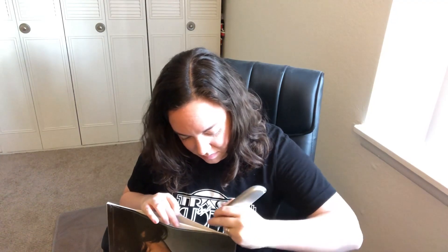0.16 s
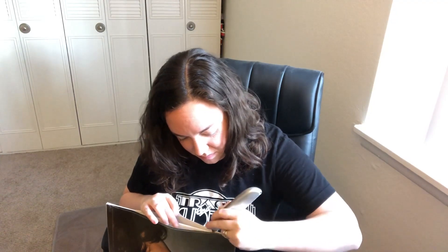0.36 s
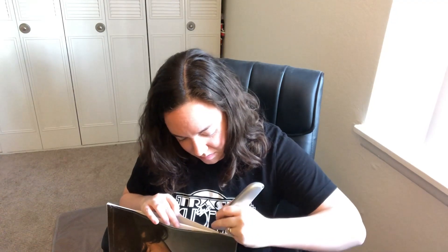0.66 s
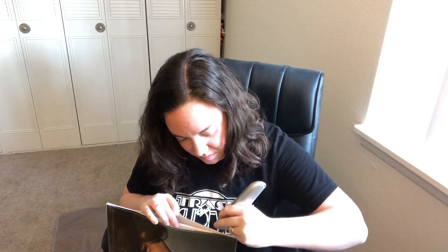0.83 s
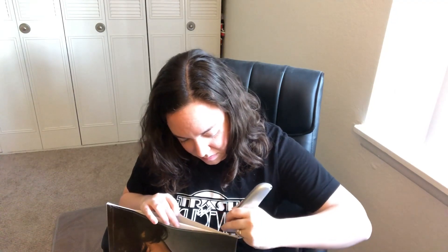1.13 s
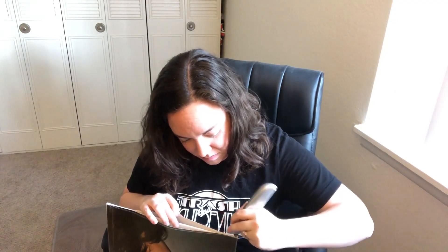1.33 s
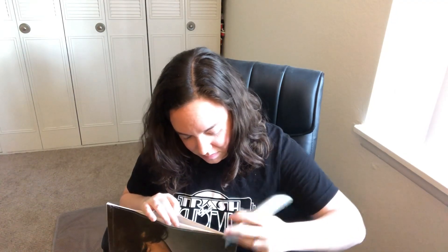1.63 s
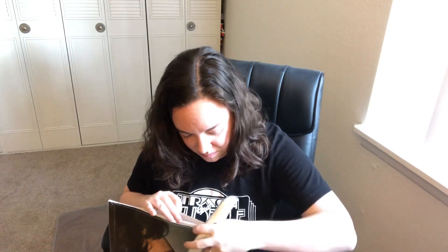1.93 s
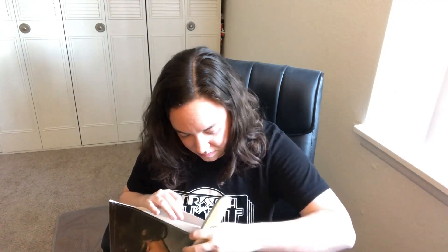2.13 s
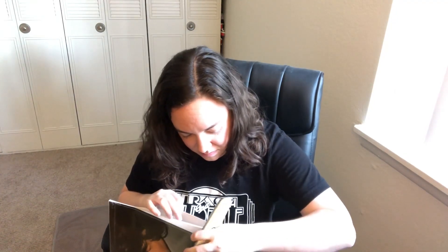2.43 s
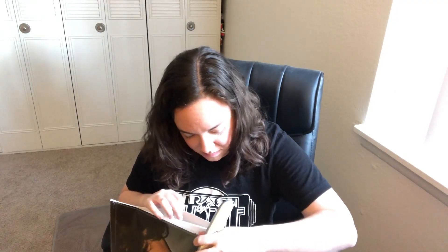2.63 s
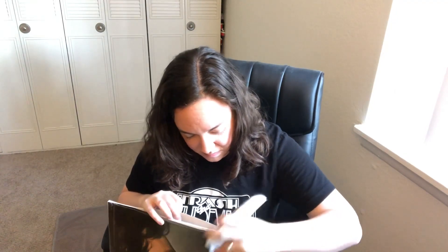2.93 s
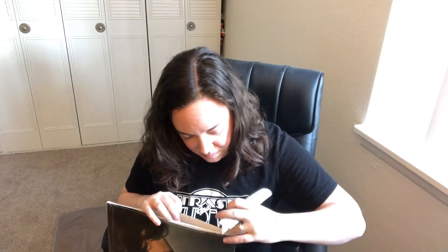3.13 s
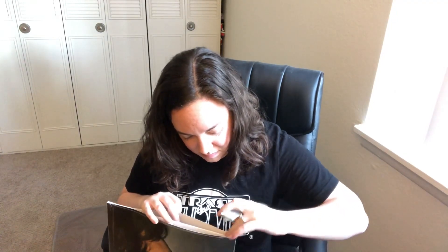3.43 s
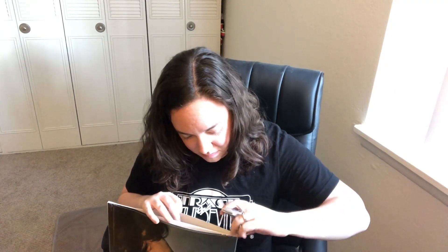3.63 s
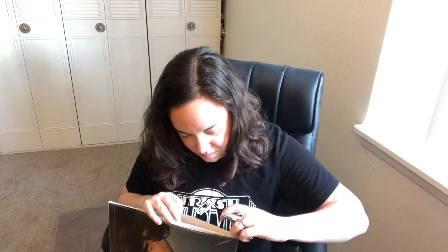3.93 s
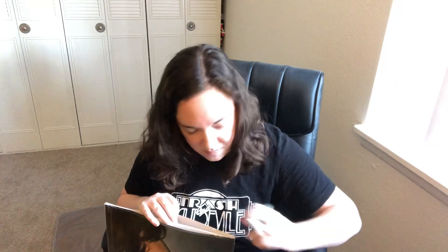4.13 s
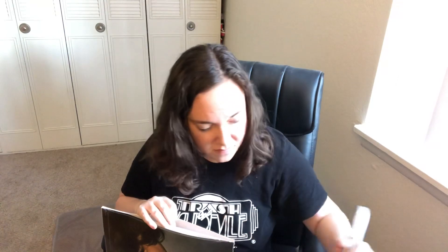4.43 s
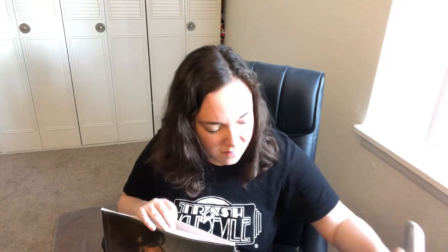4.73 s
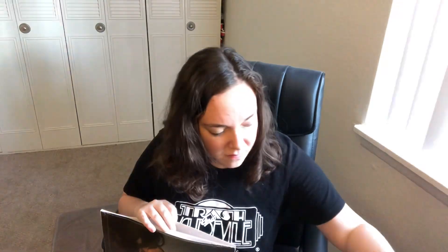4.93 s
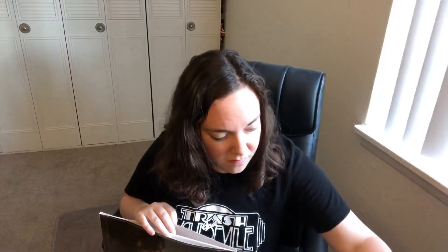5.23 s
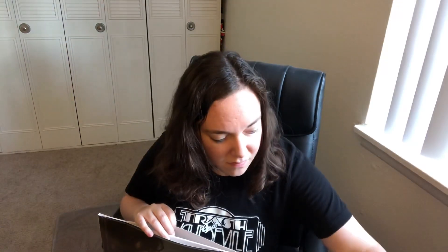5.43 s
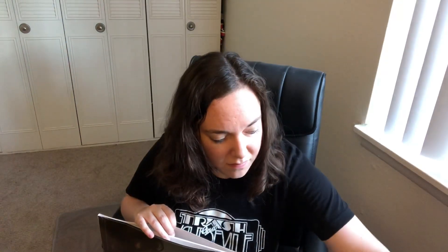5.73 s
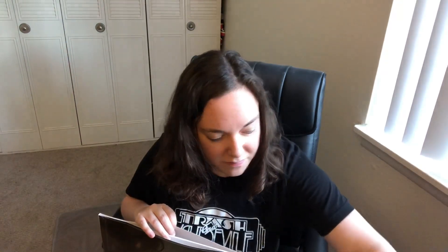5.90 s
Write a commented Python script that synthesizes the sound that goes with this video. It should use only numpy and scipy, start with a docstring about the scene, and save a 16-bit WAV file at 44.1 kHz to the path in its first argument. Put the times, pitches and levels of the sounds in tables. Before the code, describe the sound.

In a small quiet room, shrink-wrap ticks and snaps, gives way with a pop, then a knife clatters down and stiff cardboard knocks.

```python
"""Plastic film crackles as a small knife slits the shrink-wrap along a record jacket in a quiet room.
Each crackle is two bursts of tiny contacts with a ringing patch of film; slides are filtered grains.
The film gives way once with a hollow pop, made of a noisy rip and the damped tones of the jacket's pocket.
The knife lands with two bright clacks and a later faint one; falling chirps make the cardboard knocks.
Short echoes and a room tail surround them, over soft air noise, a mains hum and wavering motor tones."""
import sys
import numpy as np
from scipy import signal
from scipy.fft import rfft, irfft
from scipy.io import wavfile
from scipy.ndimage import uniform_filter1d

SR = 44100
rng = np.random.default_rng(int(sys.argv[2]) if len(sys.argv) > 2 else 0)


def log_audio(samples):
    """Write samples as a 16-bit WAV file to the path given in sys.argv[1]."""
    # one column per channel
    frames = np.atleast_2d(samples).T
    # limit to full scale, then quantise
    limited = np.clip(frames, -1, 1)
    pcm = np.round(limited * 32767).astype(np.int16)
    wavfile.write(sys.argv[1], SR, pcm)


N = 267246  # length of the scene in samples
TAPS = 4096  # length of one short hit in samples
T = np.arange(TAPS) / SR  # time within a hit, s
HZ = np.fft.rfftfreq(TAPS, 1 / SR)  # frequency grid for colouring sounds


def amp(db):
    """Turns decibels into a gain."""
    return 10 ** (np.asarray(db) / 20)


def unit(x):
    """Scales a sound to energy one."""
    return x / np.sqrt(np.sum(x ** 2) + 1e-20)


def sized(x, db):
    """Gives a hit the energy of half a millisecond at this level."""
    return amp(db) * np.sqrt(SR / 2000) * unit(x)


def read(points, hz):
    """Reads a curve between its points, on a log-frequency axis."""
    f, value = np.transpose(points)
    return np.interp(np.log(hz + 1), np.log(f), value)


def add(mix, s, sound):
    """Mixes a sound in at time s, cut off where the mix ends."""
    part = mix[max(round(s * SR), 0):][:len(sound)]
    part += sound[:len(part)]


def colour(x, db):
    """Filters with the gain db on the HZ grid, without sounding ahead of time (minimum phase)."""
    both_sides_db = np.r_[db, db[-2:0:-1]]
    log_gain = np.log(amp(both_sides_db))
    response = np.exp(np.conj(signal.hilbert(log_gain)))[:len(HZ)]
    return signal.fftconvolve(x, irfft(response))[:len(x)]


def shelves(low_db, low_hz, high_db, high_hz):
    """Smoothly raises or lowers the bass and the treble, in dB."""
    bass = low_db / (1 + (HZ / low_hz) ** 4)
    treble = high_db / (1 + (high_hz / (HZ + 1)) ** 4)
    return bass + treble


def wrinkles():
    """Random hills and dips across the spectrum, of average size one."""
    hills = signal.fftconvolve(rng.standard_normal(len(HZ)), np.hanning(50), "same")
    return unit(hills) * np.sqrt(len(HZ))


def chatter(decay_s, rise):
    """A dying rush of tiny contacts, with its energy spread about evenly over frequency."""
    envelope = amp(-60 * T / max(decay_s, .002)) * (1 - np.exp(-T / rise))
    z = rfft(rng.standard_normal(TAPS) * envelope)
    even = irfft(z / (abs(z) + 1e-12))  # keeps only the phases
    return unit(even * np.sqrt(envelope))  # fades it again, so it dies away sooner than decay_s


def ring(modes, rise=0.00034):
    """Damped sines with a soft start, each with the energy that its dB gives."""
    onset = 1 - np.exp(-T / rise)
    out = np.zeros(TAPS)
    for hz, db, t60 in modes:
        decay = np.exp(-np.log(1000) * T / t60)
        out += amp(db) * unit(onset * np.sin(2 * np.pi * hz * T) * decay)
    return out


# Film crackles, each a catch and then a release. Body, pitch and level are starting values for both parts.
# Columns: start_s [s], level_db [dB], wait_s until the release [s],
# body_db of the cardboard [dB, relative], pitch_hz of the buckling patch [Hz]
FILM_CRACKLES = [(0.386, -34.5, 0.0038, -21, 3400), (0.7874, -28, .0006, 5.5, 2650),
                 (0.9176, -37, .0008, -5, 6950), (0.9434, -32, .002, -38, 4240),
                 (0.9654, -39, 0.00056, -9, 2500), (1.0212, -46.5, .0005, -17, 6400),
                 (1.124, -31, 0.00082, 1, 2960), (1.17, -40.5, 0.00048, -22, 6640),
                 (1.202, -45.5, 0.00052, -7, 3010), (1.3952, -30.5, 0.0086, -5.5, 4560),
                 (1.528, -42.5, 0.00093, -15, 3380), (1.574, -38.5, .0006, -20, 6670),
                 (1.6063, -43, .001, -16, 2670), (1.6733, -37.5, .0074, -30, 2720),
                 (1.6875, -31, 0.0021, -29, 3260), (1.7221, -26.5, .0055, -17, 3140),
                 (1.804, -38.5, 0.00059, -27, 3500), (1.8192, -34, .001, -17, 2450),
                 (2.9247, -53, .0005, 0, 7000), (3.284, -48.5, 0.00048, -13, 2810),
                 (3.6563, -33, .004, -2, 5540), (4.259, -33.5, 0.0055, -21, 2580),
                 (4.4527, -38, 0.00052, -39, 4300), (4.799, -40, .0005, -16, 3160),
                 (4.854, -41, .001, -18, 4070), (4.9812, -28, .002, -14, 6500),
                 (5.192, -30, .0025, -21, 3340), (5.5984, -41, .001, -27, 3860),
                 (5.6198, -42, 0.00064, -32, 2930)]
TYPICAL_DB = -37  # a middling crackle; harder ones are brighter and chatter longer
CRACKLE_DECAY_S, LONGER_DB_PER_DB = 0.03, 0.48  # decay of a middling crackle, and its growth with level
SPARKLE_DB, SPARKLE_DB_PER_DB = -1.5, 0.62  # top sparkle of a middling crackle, and its growth with level
RELEASE_BRIGHTER_DB, RELEASE_BODY_DB = 3, -1.5  # the release against the catch
CATCH_DB, RELEASE_DB = -4, -4  # added to the crackle's level for each part
SLACK_FROM_S, SLACK_DULLER_DB = 2.15, -8  # once it has given way, the slack film sparkles less


def crackles(release_pitch_ratio=1.02):
    """The film catches on the blade, then lets go with a brighter snap; force sets brightness and length."""
    out = np.zeros(N)
    for s, db, wait, body_db, hz in FILM_CRACKLES:
        force_db = db - TYPICAL_DB
        decay_s = CRACKLE_DECAY_S * amp(LONGER_DB_PER_DB * force_db)
        top_db = SPARKLE_DB + SPARKLE_DB_PER_DB * force_db + SLACK_DULLER_DB * (s > SLACK_FROM_S)
        catch = film_snap(db + CATCH_DB, body_db, top_db, decay_s, hz)
        release = film_snap(db + RELEASE_DB, body_db + RELEASE_BODY_DB, top_db + RELEASE_BRIGHTER_DB,
                            decay_s, hz * release_pitch_ratio)
        add(out, s, catch)
        add(out, s + wait, release)
    return out


# Tone of the plastic film, also used by the slides. Columns: pitch_hz [Hz], gain_db [dB, relative]
FILM_TONE = [(200, -17), (600, -18), (1400, 5), (3000, 3.5), (4500, 1.5), (5700, -3.5), (7000, 1),
             (8500, -4.5), (11500, -6), (16000, -9)]
HANDLE_SHARE = 0.22  # how strongly the film's crackle is coloured by the knife that touches it


def film_snap(db, body_db, top_db, decay_s, hz, body_offset_db=8, patch_db=-9, purity_db=9,
              patch_t60=0.0054, uneven_db=2):
    """A small tear sets its own patch of film ringing, and the body setting adds the cardboard's bass."""
    tone = read(FILM_TONE, HZ) + HANDLE_SHARE * handle()
    tone += shelves(body_db + body_offset_db, 1950, top_db, 9700) + uneven_db * wrinkles()
    tick = unit(colour(chatter(decay_s, rise=.0002), tone))
    ring_db = patch_db + purity_db * np.log2(hz / 4000)  # small taut patches ring more purely
    return sized(tick + ring([(hz, ring_db, patch_t60)]), db)


# The blade or fingers sliding on the film.
# Columns: start_s [s], length_s of the rub [s], level_db [dB], body_db of the cardboard [dB, relative]
FILM_SLIDES = [(1.533, 0.025, -62.5, -13), (1.672, 0.06, -56, -7), (2.001, 0.045, -67.5, 11),
               (2.859, 0.062, -65.5, 13), (4.092, 0.035, -70, -5), (4.973, 0.046, -52.5, -17),
               (5.658, .02, -61.5, 14), (5.94, 0.039, -63.5, 5), (6.009, 0.013, -44, -4)]


def slides(grains_per_s=900, top_db=-1, handle_share=0.35):
    """Stick and slip: a swell of fine grains in the film."""
    out = np.zeros(N)
    for s, length, db, body_db in FILM_SLIDES:
        n = round(length * SR)
        grains = rng.standard_normal(SR) * (rng.random(SR) < grains_per_s / SR)
        tone = read(FILM_TONE, HZ) + handle_share * handle() + shelves(body_db, 1900, top_db, 8500)
        rub = colour(grains[:n] * signal.windows.tukey(n, .4), tone)
        grain = chatter(.005, rise=.0001)
        add(out, s, amp(db) * np.sqrt(n) * unit(signal.fftconvolve(rub, grain)))
    return out


# The film gives way over the hollow jacket, in two close bursts.
# Columns: start_s [s], level_db [dB], decay_s setting of the rip's chatter [s]
POP_BURSTS = [(2.143, -27, 0.012), (2.1449, -17.5, 0.033)]
# Tone of the rip. Columns: pitch_hz [Hz], gain_db [dB, relative]
POP_TONE = [(60, -29), (200, -8), (450, -2), (780, -9.5), (1100, 3), (1550, -3), (2000, -9), (2450, -5),
            (3250, -11.5), (4600, -14.5), (5800, -16.5), (7270, -11), (10000, -21.5), (16000, -28)]
# Ringing tones of the jacket's pocket.
# Columns: pitch_hz [Hz], level_db [dB, against the rip], t60_s to fade by 60 dB [s]
POCKET_TONES = [(450, -21, 0.032), (1106, -12, 0.04), (1497, -6.5, 0.028), (2430, -15, .025),
                (4600, -19, .012)]


def pop():
    """The taut film lets go and the jacket's pocket sounds."""
    out = np.zeros(N)
    for s, db, decay_s in POP_BURSTS:
        rip = unit(colour(chatter(decay_s, rise=0.00038), read(POP_TONE, HZ)))
        add(out, s, sized(rip + ring(POCKET_TONES), db))
    return out


# The knife meets a hard surface. Columns: start_s [s], level_db [dB], decay_s setting of the chatter [s],
# ring_db of the blade [dB, relative], bright_db of the contact's treble [dB, relative]
KNIFE_CLACKS = [(5.0113, -5, 0.033, -8.5, -3), (5.292, -7, .016, -7.5, -5.5), (6.017, -29, 0.038, -2, -2)]
# The steel blade's ringing tones, some close together.
# Columns: pitch_hz [Hz], level_db [dB, before ring_db], t60_s to fade by 60 dB [s]
BLADE_TONES = [(5490, -18, .1), (6475, -16, .12), (7110, -19, .1), (7640, -20, .1), (9145, -16, .1),
               (9252, -16, .1), (9296, -16, .14), (9600, -19, .08)]


def knife(low_db=-14, uneven_db=2.0):
    """A hard chatter of contacts sounds the handle, differently at each spot, and sets the blade ringing."""
    out = np.zeros(N)
    for s, db, decay_s, ring_db, bright_db in KNIFE_CLACKS:
        tone = handle(valley_db=-12.5) + shelves(low_db, 1450, bright_db, 8300) + uneven_db * wrinkles()
        contact = unit(colour(chatter(decay_s, rise=0.00139), tone))
        blade = amp(ring_db) * ring(BLADE_TONES)
        add(out, s, sized(contact + blade, db))
    return out


# Broad resonances of the knife's handle. Columns: pitch_hz [Hz], width_hz [Hz], level_db [dB, relative]
HANDLE_RESONANCES = [(1830, 390, -5), (2220, 340, -1), (2910, 400, 3), (3310, 200, 0.5), (3750, 290, 1.5),
                     (4195, 240, 2.5), (4680, 370, -0.5), (5600, 620, 1), (6450, 560, 3.5), (7040, 910, 3),
                     (7820, 540, 3), (8800, 400, -2), (9400, 1060, 5), (11270, 990, 0), (12100, 770, 0.5),
                     (13070, 650, -2), (13450, 400, 1.5), (15000, 800, 3)]


def handle(valley_db=-14):
    """The handle's resonances as power peaks above a floor, in dB."""
    power = amp(valley_db) ** 2
    for hz, width, db in HANDLE_RESONANCES:
        power = power + amp(db) ** 2 / (1 + (2 * (HZ - hz) / width) ** 2) ** 2
    return 10 * np.log10(power)


# Knocks on the jacket as the hand shifts on it.
# Columns: start_s [s], level_db [dB], bass_db [dB, relative], treble_db [dB, relative]
JACKET_KNOCKS = [(5.7219, -11.5, -1.5, 4.5), (5.9479, -26.5, 12, -14), (6, -27.5, 8, -14),
                 (6.011, -21, 21.5, 4), (6.0257, -30, 13, 4), (6.044, -43, 13, -1)]
# Tone of the cardboard. Columns: pitch_hz [Hz], gain_db [dB, relative]
CARDBOARD_TONE = [(100, -24.5), (250, -9), (380, -1), (480, 1), (620, -4), (795, 3), (1130, -7.5),
                  (1350, -1.5), (1650, -13), (2300, -5.5), (4200, -16.5), (6570, -13.5), (8360, -24),
                  (10300, -20.5), (16000, -31)]
# The jacket's panel rings briefly.
# Columns: pitch_hz [Hz], level_db [dB, against the thud], t60_s to fade by 60 dB [s]
PANEL_TONES = [(464, -13, .06), (796, -14.5, 0.08)]
BEND_TRAVEL_S = 0.00159  # travel time of the bending wave at 1 kHz


def knocks(scatter_db=-7):
    """Bending waves cross the stiff board, treble first, so each knock is a quick falling chirp."""
    out = np.zeros(N)
    bend = np.exp(-4j * np.pi * BEND_TRAVEL_S * np.sqrt(1000 * HZ))  # delays low pitches the most
    for s, db, bass_db, treble_db in JACKET_KNOCKS:
        blow = signal.unit_impulse(TAPS) + amp(scatter_db) * chatter(0.016, rise=0.0015)
        wave = irfft(rfft(blow) * bend)
        tone = read(CARDBOARD_TONE, HZ) + shelves(bass_db, 366, treble_db, 5900)
        thud = unit(colour(wave, tone))
        add(out, s, sized(thud + ring(PANEL_TONES, rise=.004), db))
    return out


def handling():
    """What film, knife and jacket send out in one direction; each call draws new fine detail."""
    return crackles() + slides() + pop() + knife() + knocks()


# Echoes from the desk and walls. Columns: delay_s [s], level_db [dB, against the sound fed in]
EARLY_ECHOES = [(.0024, -12.5), (.0068, -14), (0.0187, -15.5)]


def reflections(x):
    """The first few echoes, each smeared by a cluttered surface."""
    response = np.zeros(TAPS)
    for delay, db in EARLY_ECHOES:
        add(response, delay, amp(db) * chatter(0.01, rise=.0001))
    return signal.fftconvolve(x, response)[:N]


# How long the room's tail lasts. Columns: pitch_hz [Hz], t60_s to fade by 60 dB [s]
TAIL_LENGTH = [(150, 0.23), (500, 0.27), (1400, 0.31), (3500, .38), (7000, 0.35), (10000, 0.31),
               (16000, .22)]
# How strong the tail is. Columns: pitch_hz [Hz], level_db [dB, relative to the direct sound]
TAIL_LEVEL = [(150, 4.5), (1000, -5), (4000, -6), (8000, -5.5), (16000, -10)]


def room(x, build_up=0.0068):
    """The short dense tail of a small carpeted room: noise that fades at its own rate at each pitch."""
    t = np.arange(SR * 3 // 5) / SR
    hz, at, z = signal.stft(rng.standard_normal(len(t)), SR, nperseg=256)
    rate = np.log(1000) / read(TAIL_LENGTH, hz)[:, None]
    level = amp(read(TAIL_LEVEL, hz))[:, None] * np.sqrt(2 * rate / SR)
    z *= level * np.exp(-rate * at)
    tail = signal.istft(z, SR, nperseg=256)[1][:len(t)]
    response = tail * (1 - np.exp(-(t / build_up) ** 2))
    return signal.fftconvolve(x, response)[:N]


# Tone of the steady ventilation noise. Columns: pitch_hz [Hz], level_db [dB, relative]
AIR_TONE = [(22, -31), (36, -12), (52, -8), (68, -9.5), (95, -17), (140, -7), (185, -14.5), (215, -11.5),
            (350, -16.5), (560, -22), (900, -23.5), (1800, -32), (4200, -34.5), (9000, -48), (16000, -58)]
AIR_DB = -55  # average level of the air noise
# Mains hum, motor and duct tones.
# Columns: pitch_hz [Hz], level_db [dB], width_hz setting how far the tone wavers [Hz]
HUM_TONES = [(38.5, -73, 2), (56.8, -61.5, 3.85), (76, -60, 0.98), (119.6, -51, 0.042), (154.8, -62, 2.6),
             (332.6, -70, 4.52), (381, -72.5, 2)]


def ventilation():
    """Soft filtered air noise with a steady mains hum and wavering motor tones."""
    noise = rfft(rng.standard_normal(N))
    air = irfft(noise * amp(read(AIR_TONE, np.fft.rfftfreq(N, 1 / SR))), N)
    out = amp(AIR_DB) * np.sqrt(N) * unit(air)
    for hz, db, width in HUM_TONES:
        drift = np.cumsum(rng.standard_normal(N)) * np.sqrt(2 * np.pi * abs(width) / SR)
        phase = 2 * np.pi * hz * np.arange(N) / SR + uniform_filter1d(drift, size=2000)
        out += amp(db) * np.sqrt(2) * np.sin(phase)
    return out


def scene():
    """Direct sound, early echoes and a tail fed from two directions, over the hum."""
    front, back = handling(), handling()
    tail = (room(front) + room(back)) / np.sqrt(2)
    return (front + reflections(back) + tail + ventilation())[None]


EDGE_HZ = 15950  # upper band limit


def record(dry):
    """The microphone's low cut at 34 Hz and the recorder's upper band limit."""
    low_cut = signal.butter(4, 34, "highpass", fs=SR, output="sos")
    lean = signal.sosfilt(low_cut, dry)
    band_limit = signal.firwin(255, EDGE_HZ, window=("kaiser", 8), fs=SR)
    return signal.oaconvolve(lean, band_limit[None], "same")


dry = scene()
out = record(dry)
log_audio(out)
```